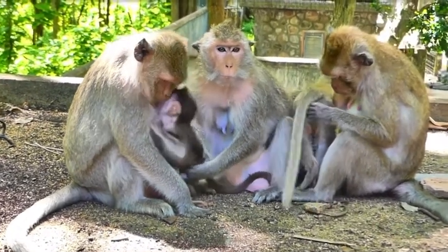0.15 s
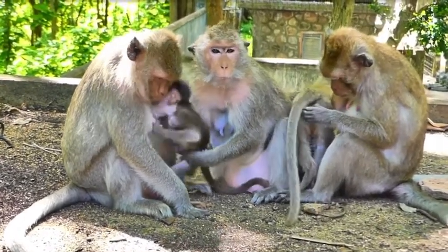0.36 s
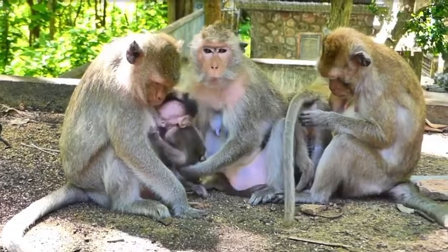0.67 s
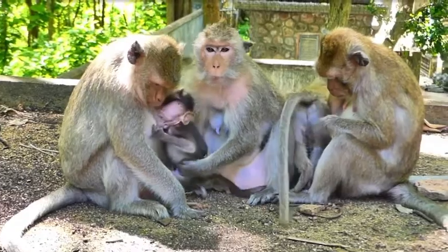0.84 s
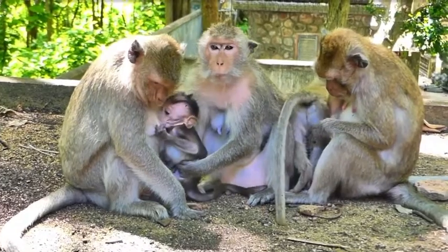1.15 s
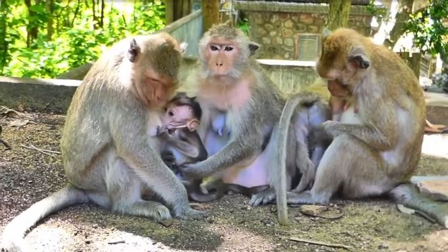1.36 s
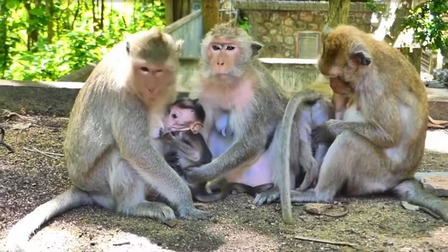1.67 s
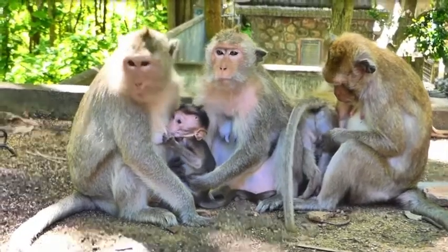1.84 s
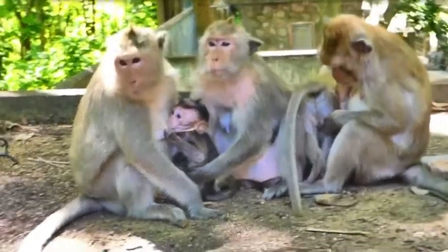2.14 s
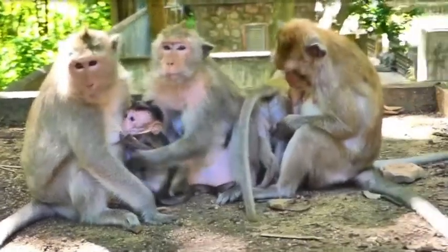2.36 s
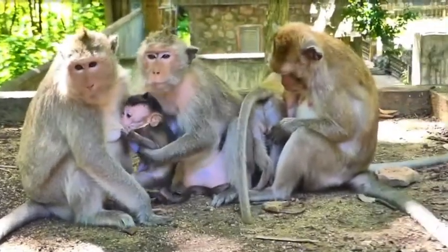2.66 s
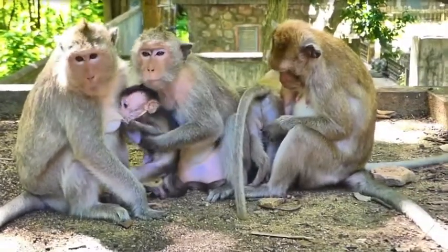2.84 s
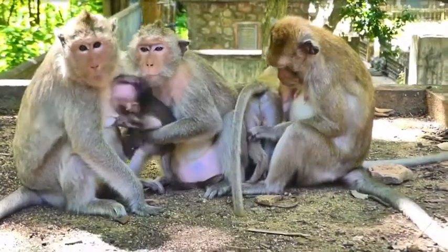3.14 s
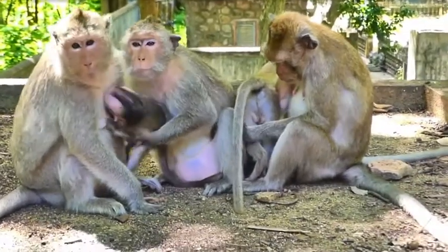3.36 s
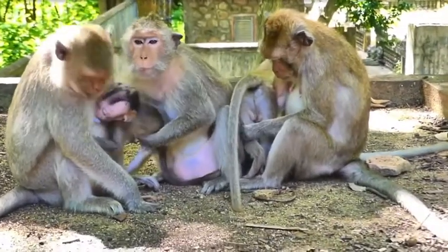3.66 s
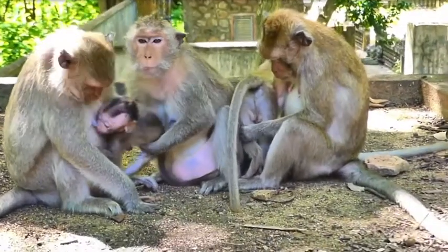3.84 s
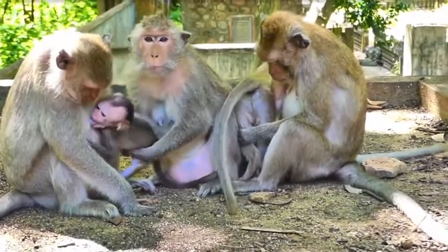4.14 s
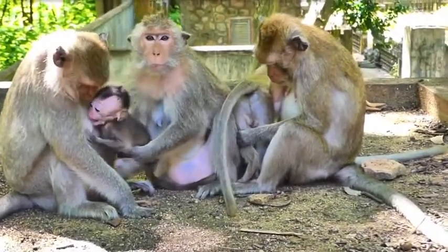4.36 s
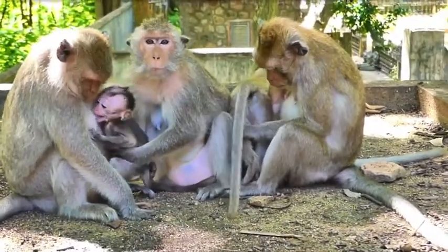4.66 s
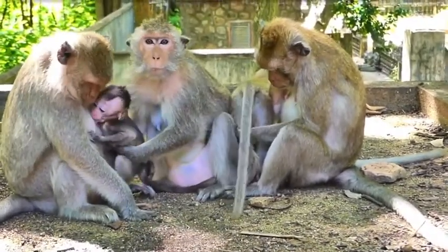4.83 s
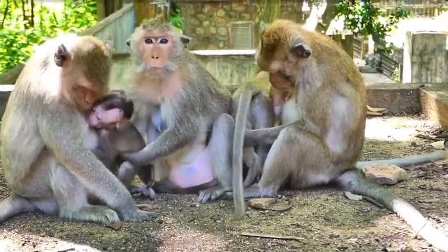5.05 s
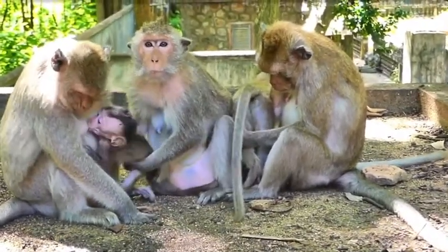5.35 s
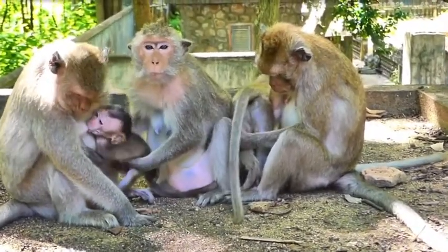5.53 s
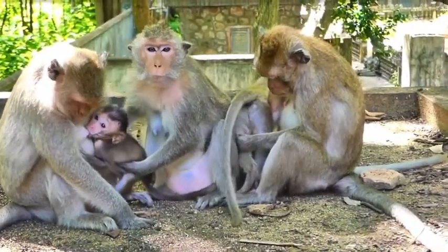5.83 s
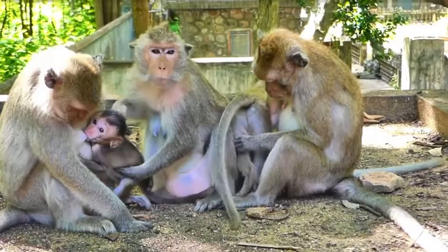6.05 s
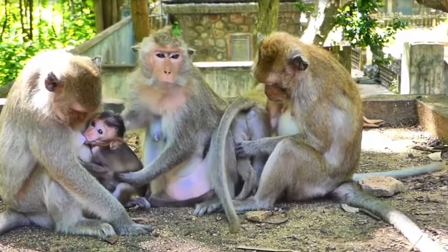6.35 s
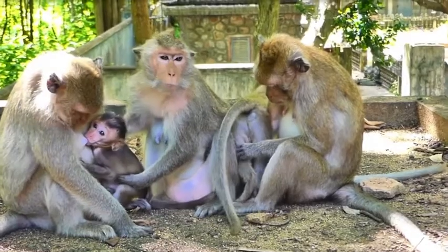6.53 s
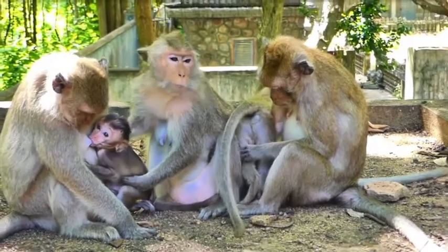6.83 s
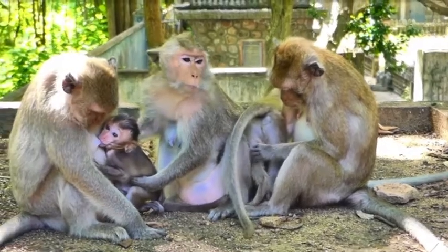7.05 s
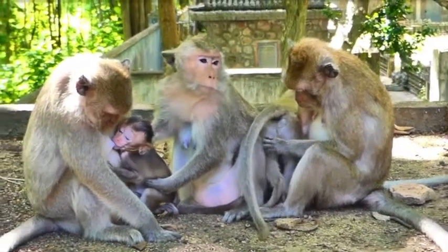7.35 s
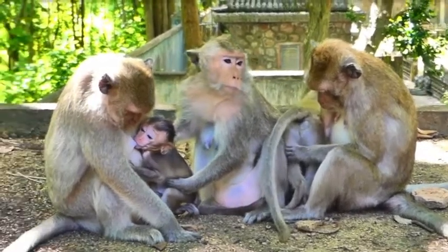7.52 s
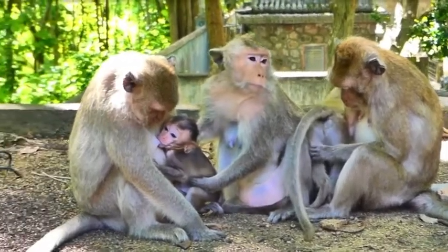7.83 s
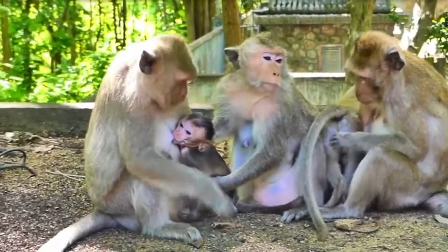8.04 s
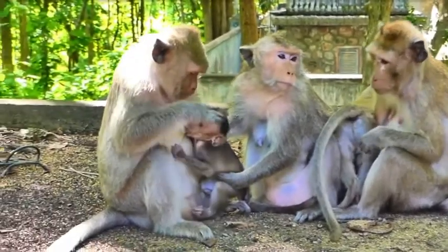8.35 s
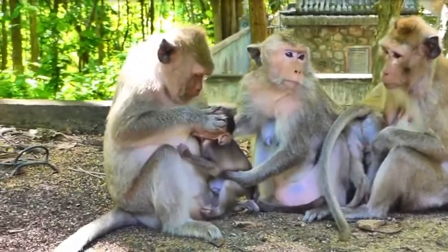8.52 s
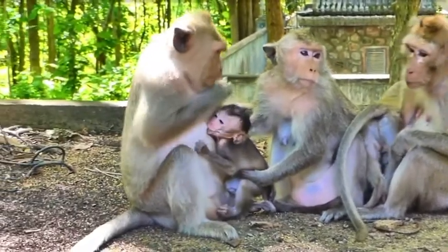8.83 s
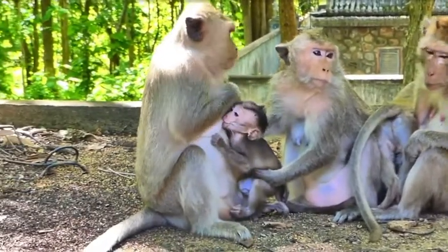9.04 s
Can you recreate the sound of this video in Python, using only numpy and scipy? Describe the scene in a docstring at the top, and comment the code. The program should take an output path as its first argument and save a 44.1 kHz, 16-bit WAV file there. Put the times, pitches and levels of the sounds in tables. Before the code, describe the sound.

Close stereo pickup in an open yard with trees and walls: quick faint monkey chirps and small ground taps come first, followed by two loud, needle-like baby squeals of under a second each, swelling in jerky pushes. The background dips slightly beneath them, then wavering whines, rustling litter, a long hollow coo and a few snaps return over ringing insects.

```python
"""Infant monkey squealing among its troop

An infant monkey close by squeals twice, a gliding whistle broken by a second vibration and puffs of air.
Farther off the troop coos, chirps, whines and hoots in harmonics shaped by mouth resonances.
Feet snap twigs and thud on dry ground as decaying modes; trunks and walls answer with decaying noise.
Insects ring on one narrow band, filtered noise rumbles and rustles, and gain control ducks the squeals."""
import sys
import numpy as np
from scipy import signal
from scipy.fft import rfft, irfft, next_fast_len
from scipy.io import wavfile
from scipy.ndimage import uniform_filter1d, map_coordinates

SR = 44100
rng = np.random.default_rng(int(sys.argv[2]) if len(sys.argv) > 2 else 0)


def to_linear_factor(level_db):
    """Convert decibel levels (scalar or array-like) to linear amplitude factors."""
    exponent = np.asarray(level_db, float) / 20
    return 10 ** exponent


def to_wav(s):
    """Save 16-bit WAV."""
    ch = np.atleast_2d(s).T  # columns
    pcm = np.round(np.clip(ch, -1, 1) * 32767)  # PCM
    wavfile.write(sys.argv[1], SR, pcm.astype(np.int16))


N = 404838
TIME = np.arange(N) / SR

# Infant's whistle, twice a leap up, a sagging top and a plunge: (time [s], pitch [Hz])
SQUEAL_PITCH = [(2.884, 7700), (2.896, 10250), (2.907, 13800), (2.927, 15150), (2.955, 16300),
                (2.985, 15200), (3.01, 15760), (3.03, 15640), (3.055, 15900), (3.085, 14900),
                (3.103, 15800), (3.14, 15000), (3.16, 15700), (3.193, 15000), (3.204, 14000),
                (3.264, 13170), (3.284, 13180), (3.314, 12180), (3.351, 12870), (3.377, 12680),
                (3.418, 14070), (3.488, 12960), (3.503, 13040), (3.519, 11100), (3.549, 8040), (3.91, 8400),
                (3.926, 10530), (3.953, 12500), (3.966, 14350), (4.022, 14080), (4.062, 14220),
                (4.162, 13790), (4.178, 13300), (4.204, 13340), (4.257, 12400), (4.291, 10850),
                (4.314, 11000), (4.344, 9470), (4.37, 9800), (4.388, 9300), (4.413, 8630), (4.432, 10600),
                (4.443, 10740), (4.46, 9930), (4.492, 12650), (4.518, 11800), (4.551, 11900),
                (4.584, 10480), (4.607, 9800), (4.645, 8480), (4.689, 6380)]
# Held level of each squeal: (start [s], end [s], level [dB])
SQUEAL_LEVELS = [(2.888, 3.545, -41), (3.913, 4.684, -41.5)]
# Quick swells in the whistle's level: (peak time [s], fall length [s], level [dB])
WHISTLE_SWELLS = [(2.895, 0.0043, -24.5), (2.914, 0.0084, -27), (2.985, 0.02, -37), (3.1, 0.031, -28),
                  (3.227, 0.031, -31), (3.27, 0.02, -31), (3.293, 0.024, -30), (3.341, 0.051, -28.5),
                  (3.383, 0.015, -28), (3.433, 0.03, -41), (3.493, 0.0089, -30.5), (3.517, 0.014, -32),
                  (3.925, 0.013, -25.5), (3.943, 0.0073, -22), (3.974, 0.039, -35), (4.034, 0.079, -38.5),
                  (4.14, 0.059, -41), (4.226, 0.018, -39), (4.272, 0.012, -27.5), (4.302, 0.033, -34.5),
                  (4.325, 0.0041, -27), (4.337, 0.01, -28), (4.351, 0.033, -27.5), (4.402, 0.017, -35),
                  (4.426, 0.0041, -27), (4.445, 0.041, -28.5), (4.468, 0.0059, -30), (4.481, 0.0074, -30),
                  (4.525, 0.043, -33.5), (4.556, 0.016, -32), (4.604, 0.018, -25), (4.621, 0.023, -27),
                  (4.653, 0.0056, -33), (4.675, 0.0099, -37.5)]
# A second, lower vibration in the whistle: (time [s], length [s], pitch [Hz], level [dB])
VOICE_BREAKS = [(4.333, 0.0081, 5040, -49.5), (4.399, 0.018, 3780, -49), (4.66, 0.011, 3090, -49),
                (4.691, 0.01, 3010, -38.5), (4.697, 0.0126, 3740, -41.5), (4.707, 0.027, 2090, -52.5)]
# Hoarse puffs of air in the squeals: (time [s], length [s], level [dB])
AIR_PUFFS = [(3.132, 0.047, -64), (3.185, 0.043, -61), (3.566, 0.045, -58), (4.696, 0.051, -43)]
# Spectrum of the puffs: (frequency [Hz], relative level [dB])
PUFF_SPECTRUM = [(1500, -23), (3000, -7), (7000, -3.5), (15000, -12.5)]
# Arched coos: (start [s], length [s], top pitch [Hz], level [dB], loss per partial [dB])
COOS = [(0.781, 0.061, 1354, -53, 2.5), (1.048, 0.13, 1327, -60, 2), (2.225, .27, 1276, -68.5, 8),
        (8.666, 0.082, 1293, -55.5, 6.5)]
# Hooked chirps, flicked upward: (start [s], length [s], from [Hz], to [Hz], level [dB])
HOOKED_CHIRPS = [(0.159, 0.095, 1944, 2510, -55), (1.25, 0.051, 794, 1060, -71.5),
                 (1.38, 0.086, 1230, 1370, -62), (1.502, 0.057, 1467, 1630, -59),
                 (1.615, 0.063, 1470, 1996, -56), (1.739, 0.044, 1750, 2010, -60)]
# Straight chirps: (start [s], length [s], from [Hz], to [Hz], level [dB])
GLIDING_CHIRPS = [(0.039, 0.039, 1650, 1384, -52), (0.079, 0.088, 1420, 1956, -56),
                  (0.248, 0.041, 2390, 2680, -56.5), (0.897, 0.15, 865, 796, -68),
                  (6.313, 0.05, 1240, 1225, -61), (6.727, 0.054, 1160, 1520, -52.5)]
# Wavering whines, one list each: (time [s], pitch [Hz], level [dB], loss per partial [dB])
WHINES = [
    [(2.07, 855, -65, 4), (2.11, 929, -73, -1), (2.17, 788, -75, 2), (2.3, 811, -76, 4),
     (2.365, 1010, -76, -2), (2.41, 984, -77, -4), (2.44, 1164, -71, -8), (2.47, 1488, -61.5, -4),
     (2.495, 1634, -66, 18)],
    [(6.148, 1284, -61, 0), (6.19, 1235, -60.5, 1), (6.21, 1363, -67, 2), (6.236, 1430, -68, -3)],
    [(4.965, 590.5, -69, -1), (5.03, 745, -67.5, 1), (5.1, 950, -76, -13.5), (5.15, 1087, -64, 3),
     (5.175, 1008, -69, -5), (5.205, 1199, -71, 12), (5.25, 1145, -64, 10), (5.28, 1008, -72.5, -3),
     (5.32, 1305, -59, 1.5), (5.43, 1543, -67, 11), (5.457, 1820, -64, 28), (5.49, 1670, -52.5, 13),
     (5.54, 1545, -61, -1.5), (5.57, 1450, -78, 8)],
    [(5.8, 728, -62, 12), (5.835, 899, -75, -8), (5.87, 1065, -68, -4.5), (5.91, 902, -77.5, 0),
     (6.09, 836, -75.5, -4)],
    [(8.82, 813, -71.5, -7), (8.9, 880, -84, -2), (8.96, 900, -71.5, -5.5), (9.04, 788, -72.5, 0),
     (9.14, 815, -73.5, -4)],
    [(8.085, 1030, -66, 5), (8.12, 1210, -73.5, -4), (8.145, 1290, -58, 2), (8.16, 1280, -76, 6)],
    [(8.215, 1260, -59, 4), (8.245, 1395, -64.5, -3), (8.262, 1293, -59, 4), (8.295, 1370, -72, -4),
     (8.335, 1245, -71, 0)],
]
# A long hollow coo that catches before its drop: (time [s], pitch [Hz], level [dB])
LONG_COO = [(7.678, 1020, -63), (7.715, 1170, -62), (7.78, 1275, -60), (7.805, 1195, -63),
            (7.92, 1205, -66), (7.932, 1080, -88), (7.96, 1090, -67), (7.99, 1040, -68), (8.01, 880, -80)]
# Its partials from the first up, the second weak: (relative level [dB])
LONG_COO_PARTIALS = [-2, -11, -9.5, -19]
# A low hoot from afar: (time [s], pitch [Hz], level [dB])
HOOT = [(2.2, 251.5, -78), (2.36, 254.4, -67.5), (2.55, 257, -72.5), (2.7, 265, -84)]
# Its partials from the first up: (relative level [dB])
HOOT_PARTIALS = [-9.5, -2.5, -1.5, -12, -9.5]
# Mouth resonances of the troop: (frequency [Hz], gain [dB])
MOUTH_RESONANCES = [(300, 5), (1200, 1), (1700, -3.5), (2000, 0), (2450, -4), (3100, 5.5), (3800, -1),
                    (4600, -11.5), (6300, 4.5), (9000, -5)]
# Twig snaps and thuds of feet: (time [s], snap level [dB], snap pitch [Hz], thud level [dB])
FOOTFALLS = [(.026, -46.5, 2380, -74), (0.5211, -43.5, 3300, -63), (1.305, -63.5, 630, -53.5),
             (1.709, -51, 2460, -80), (1.9792, -30.5, 3635, -62), (1.986, -47.5, 853, -60),
             (2.023, -46, 863, -52), (2.0568, -51, 1300, -50), (6.127, -56, 2280, -55),
             (6.8038, -42, 1530, -60), (7.63, -53, 1790, -73.5), (7.648, -51, 1380, -63.5),
             (8.0925, -40, 5200, -73), (8.228, -52, 2145, -47.5), (8.8164, -51.5, 1170, -42),
             (9.1128, -47, 1497, -45), (9.159, -46.5, 1830, -71)]
# Modes of the thudding ground: (frequency [Hz], relative level [dB], decay by 60 dB [s])
GROUND_MODES = [(318, 4.5, 0.046), (450, 9, 0.02), (975, 11, 0.007)]
# Reverberation of the yard: (frequency [Hz], decay by 60 dB [s])
YARD_DECAY = [(500, 0.94), (4000, 0.68), (15000, 0.41)]
# Gusts and shuffles over the calm: (time [s], length [s], rumble level [dB], rustle level [dB])
GUSTS = [(0.09, 0.49, -71, -106), (2.23, 0.76, -68, -79.5), (5.392, 1.18, -77.5, -61.5),
         (6.523, 0.49, -70.5, -63), (7.424, 0.11, -74, -64), (8.273, 0.27, -74, -70),
         (9.13, 0.9, -73.5, -69)]
# Spectrum of the far rumble: (frequency [Hz], relative level [dB])
RUMBLE_SPECTRUM = [(15, -57.5), (30, -32.5), (100, -6.5), (290, -6), (1000, -17), (2000, -22)]
# Spectrum of rustling leaves and litter: (frequency [Hz], relative level [dB])
RUSTLE_SPECTRUM = [(400, -34), (900, -2), (2000, -3), (4500, -2.5), (7000, -5), (10000, -8), (13000, -12.5),
                   (16000, -17.5)]
# Likeness of left and right in the noise: (frequency [Hz], correlation [-1 to 1])
STEREO_LIKENESS = [(250, -0.37), (600, -0.29), (1500, 0.2), (6000, 1), (11000, 0.57)]
# Unlikeness of the two microphone ports: (frequency [Hz], left over right [dB])
PORT_DIFFERENCE = [(40, 4), (200, 1.5), (1200, -2.5), (4000, -1.5)]


def along(points, hz):
    """Interpolation of (Hz, value) points on a logarithmic frequency axis."""
    f, value = np.transpose(points)
    return np.interp(np.log(hz + 1), np.log(f + 1), value)


def curves(rows):
    """Linear interpolation in time: one value per sample for each column after the time."""
    s, *columns = np.transpose(rows)
    return [np.interp(TIME, s, c) for c in columns]


def unit(x):
    """Normalization to a root mean square of 1."""
    return x / np.sqrt(np.mean(x ** 2) + 1e-20)


def wobble(rate):
    """Slow random modulation: a smooth curve through rate random knots a second."""
    knots = rng.standard_normal(int(N * rate / SR) + 4)
    return map_coordinates(knots, [TIME * rate])


def coloured(x, spectrum):
    """Linear filtering: the spectrum is multiplied by a gain curve, zero outside its end points."""
    m = next_fast_len(N + 8192)
    hz = np.fft.rfftfreq(m, 1 / SR)
    in_band = (hz >= spectrum[0][0]) & (hz <= spectrum[-1][0])
    return irfft(rfft(x, m) * to_linear_factor(along(spectrum, hz)) * in_band, m)[..., :N]


def bump(s, length):
    """Gaussian envelope around a moment, length being its full width at 1/e."""
    return np.exp(-((TIME - s) / length * 2) ** 2)


def phase(hz):
    """Phase as the running integral of frequency."""
    return 2 * np.pi * np.cumsum(hz) / SR


def squeals():
    """Whistle and nonlinear mixing: a second vibration makes sum and difference tones with it."""
    jitter = 1 + 0.0019 * wobble(150) + 0.00247 * wobble(40)
    hz = uniform_filter1d(curves(SQUEAL_PITCH)[0], size=240) * jitter
    size = sum(to_linear_factor(db) * (TIME > s) * (TIME < end) for s, end, db in SQUEAL_LEVELS)
    for s, length, db in WHISTLE_SWELLS:
        # the rise takes 0.7 of the time of the fall
        size = size + to_linear_factor(db) * bump(s, length * np.where(TIME < s, 0.7, 1))
    flutter_db = 1.3 * wobble(130)
    size = uniform_filter1d(size, size=40) * to_linear_factor(flutter_db) * np.sqrt(2)

    turn = phase(hz)
    overtone = to_linear_factor(-4.0) * (hz < 7900) * np.sin(2 * turn)
    out = size * (np.sin(turn) + overtone)

    mixing = np.clip(size * to_linear_factor(50), 0, 1)  # sum and difference tones need the whistle
    for s, length, low_hz, db in VOICE_BREAKS:
        sag = 0.08 * np.clip((TIME - s) / length, -1, 1)
        low = phase(low_hz * (1 - sag + 0.018 * wobble(200)))
        mixed = 1.64 * np.sin(turn - low) + 0.5 * np.sin(turn + low)
        out += to_linear_factor(db) * bump(s, length) * (np.sin(low) + mixing * mixed)

    breath = unit(coloured(rng.standard_normal(N), PUFF_SPECTRUM)) * to_linear_factor(3.5 * wobble(300))
    return out + breath * sum(to_linear_factor(db) * bump(s, length) for s, length, db in AIR_PUFFS)


def voice(rows, partials_db, fade, rough, flicker_db):
    """Harmonic series on an unsteady pitch; partials flicker independently, the high ones most."""
    start, end = round(rows[0][0] * SR), round(rows[-1][0] * SR)
    hz, db, *loss = [uniform_filter1d(c, size=400)[start:end] for c in curves(rows)]
    loss_db = sum(loss)  # 0 where the rows have no loss column
    t = TIME[:end - start]
    gate = np.clip(np.minimum(t, t[::-1]) / fade, 0, 1)
    turn = phase(hz * (1 + rough * wobble(70)[start:end]))
    knots = rng.standard_normal((len(partials_db), 40))
    tone = 0
    for k, partial_db in enumerate(partials_db):
        flicker = flicker_db * np.interp(t * 45, np.arange(40), knots[k]) * np.sqrt(k + 1)
        # a loss grows with each partial; a negative loss lifts all the upper partials alike
        dulling_db = np.maximum(k * loss_db, min(k, 1) * loss_db)
        tone = tone + to_linear_factor(db + partial_db - dulling_db + flicker) * np.sin((k + 1) * turn)
    out = np.zeros(N)
    out[start:end] = np.sqrt(2) * gate * tone
    return out


def call(s, length, pitch, db, loss_db):
    """Frequency glide under an arched envelope: five partials on a (share of length, Hz) contour."""
    share = np.linspace(0, 1, num=21)
    hz = np.interp(share, *np.transpose(pitch))
    rising = hz[10] > 1.08 * hz[0] and hz[-1] > hz[10]
    loudest_at = 0.32 if rising else 0.22  # share of length: steep risers peak late
    level_db = db + np.interp(share, [0, loudest_at, 1], [-13, 0, -6.5])
    partials_db = [-loss_db * k - 14 * (k > 2) for k in range(5)]  # further loss above the third
    rows = np.transpose([s + length * share, hz, level_db])
    return voice(rows, partials_db, fade=0.007, rough=0.011, flicker_db=2.6)


def purity(from_hz, to_hz):
    """Spectral slope growing with pitch: dB lost a partial, 6.5 at 1 kHz and 7 more per kHz."""
    mean_khz = (from_hz + to_hz) / 2000
    return max(6.5 + 7 * (mean_khz - 1), 2)


def troop():
    """Source and resonator: harmonic calls pass fixed mouth resonances; the far hoot bypasses them."""
    out = np.zeros(N)
    for s, length, hz, db, loss_db in COOS:
        # scoop up, hold, sag
        pitch = [(0, hz * (1 - 0.25)), (0.24, hz), (0.773, hz), (1, hz * (1 - 0.081))]
        out += call(s, length, pitch, db, loss_db)
    for s, length, from_hz, to_hz, db in HOOKED_CHIRPS:
        pitch = [(0, from_hz), (0.5, from_hz * 1.01), (0.8, to_hz), (1, to_hz)]
        loss_db = 5.5 * (from_hz / 1500) ** 3
        out += call(s, length, pitch, db, loss_db)
    for s, length, from_hz, to_hz, db in GLIDING_CHIRPS:
        out += call(s, length, [(0, from_hz), (1, to_hz)], db, purity(from_hz, to_hz))
    for rows in WHINES:
        out += voice(rows, [0, 0, -6, -17], fade=0.007, rough=0.012, flicker_db=2)
    out += voice(LONG_COO, LONG_COO_PARTIALS, fade=0.007, rough=0.006, flicker_db=1.5)
    hoot = voice(HOOT, HOOT_PARTIALS, fade=0.03, rough=0.03, flicker_db=4.5)
    return coloured(out, MOUTH_RESONANCES) + hoot


def steps():
    """Impact and modal decay: a noisy snap of a few cycles over a short hollow thud."""
    out, t = np.zeros(N + SR), TIME[:2048]
    for s, db, hz, thud_db in FOOTFALLS:
        crack = unit(uniform_filter1d(rng.standard_normal(len(t)), size=int(SR / hz) + 1))
        decay = to_linear_factor(-60 * t * hz / 15)  # 60 dB in 15 cycles
        snap = decay * (1 + 0.55 * crack) * np.sin(2 * np.pi * hz * t)
        hollow = 0
        for mode_hz, mode_db, t60 in GROUND_MODES:
            mode_level = to_linear_factor(mode_db + rng.normal(0, 1) - 60 * t / t60)
            hollow = hollow + mode_level * np.sin(2 * np.pi * mode_hz * t)
        thud = (1 - np.exp(-t / 0.0066)) * hollow  # soft onset
        out[round(s * SR):][:len(t)] += to_linear_factor(db) * snap + to_linear_factor(thud_db) * thud
    return out[:N]


def yard(x, spread):
    """Reverberation off trunks and walls: convolution with noise whose decay depends on frequency."""
    hz, t, z = signal.stft(rng.standard_normal((2, SR // 2)), SR, nperseg=256)
    decay = to_linear_factor(-60 * t / along(YARD_DECAY, hz)[:, None])
    mid, side = signal.istft(z * decay, SR, nperseg=256)[1]
    tail = np.array([mid + spread * side, mid - spread * side]) / np.linalg.norm(mid)
    delayed = np.pad(x, (300, 0))[None]  # the tail starts 300 samples late
    return signal.fftconvolve(delayed, tail, axes=1)[:, :N]


def insects():
    """Narrow-band resonance: a near caller clicks its ringing shell over a randomly modulated crowd."""
    cycle = 2 * np.pi * (TIME - 0.2) / 0.878
    hz = 5455 + 42 * np.sin(cycle) - 14 * np.sin(2 * cycle)  # creeps up, drops back for all

    def churn(rate):
        """Quadrature modulation: two random envelopes on one carrier make a narrow band."""
        return wobble(rate) * np.sin(phase(hz)) + wobble(rate) * np.cos(phase(hz))

    clicks_per_s, click_rise_s = 117, 0.0023
    count = np.cumsum(clicks_per_s * (1 + 0.005 * wobble(9))) / SR
    leader = np.zeros(N)
    for back in range(3):  # the latest clicks overlap
        click = np.floor(count) - back
        since = TIME - np.interp(click, count, TIME, left=-1)
        strength = np.where(click % 2, 0.5, 1)  # every second click is weaker
        envelope = since * np.exp(-since / click_rise_s)
        leader += strength * envelope * np.sin(2 * np.pi * hz * since)
    centre = unit(churn(205)) + to_linear_factor(-1.5 + 2.5 * wobble(14)) * unit(leader)
    others = 0.12 * churn(265)  # opposite in the two channels, for width
    return to_linear_factor(-62.5) * unit(np.array([centre + others, centre - others]))


def rush(spectrum, patchy_db):
    """Partly correlated stereo noise of rms 1, its gain patchy in time and frequency."""
    hz, _, z = signal.stft(rng.standard_normal((2, N)), SR, nperseg=512)
    field = uniform_filter1d(rng.standard_normal(z.shape[1:]), size=6, axis=0)
    field = uniform_filter1d(field, size=10, axis=1)
    # mid-side angle that gives the wanted correlation
    turn = np.arccos(np.clip(along(STEREO_LIKENESS, hz), -1, 1))[:, None] / 2
    patched = z * to_linear_factor(patchy_db * unit(field)) * [np.cos(turn), np.sin(turn)]
    mid, side = signal.istft(patched, nperseg=512)[1][:, :N]
    return unit(coloured(np.array([mid + side, mid - side]), spectrum))


def air():
    """Broadband noise under slow envelopes: far rumble, and leaves and litter rustling in gusts."""
    low, high = to_linear_factor(-67), to_linear_factor(-71)  # the calm
    for s, length, rumble_db, rustle_db in GUSTS:
        low = low + to_linear_factor(rumble_db) * bump(s, length)
        high = high + to_linear_factor(rustle_db) * bump(s, length)
    rumble = low * to_linear_factor(1.3 * wobble(6.7)) * rush(RUMBLE_SPECTRUM, patchy_db=1.44)
    rustle = high * to_linear_factor(0.76 * wobble(16)) * rush(RUSTLE_SPECTRUM, patchy_db=3.0)
    return rumble + rustle


def scene():
    """Superposition of sources and echoes; the highest notes beam unevenly to the left port."""
    near, far, feet = squeals(), troop(), steps()
    khz_over = (curves(SQUEAL_PITCH)[0] - 11000) / 1000
    lean_db = np.clip(0.6 * khz_over, -0.3, 2.1) + 1.1 * wobble(25)
    near_echo = to_linear_factor(-16.5) * yard(near, spread=0.38)
    far_echo = to_linear_factor(-13.5) * yard(far + feet, spread=0.62)
    direct = near * to_linear_factor([lean_db, -lean_db]) + far + feet
    return direct + near_echo + far_echo + insects() + air()


def roll_off(x):
    """The treble ends steeply here."""
    return signal.sosfilt(signal.butter(12, 15720, fs=SR, output="sos"), x)


def record(dry):
    """Compression after two unlike ports: gain falls with smoothed level and recovers slowly."""
    ports = []
    for channel, side in zip(dry, (1, -1)):
        response = [(f, side * db / 2) for f, db in PORT_DIFFERENCE]
        ports.append(coloured(channel, [(0.0072, 0)] + response + [(15900, 0)]))
    stereo = np.array(ports)

    threshold_db, share_taken_back, release_db_per_s = -44.5, 0.25, 21
    power = uniform_filter1d(np.mean(stereo ** 2, axis=0), size=2000)
    level_db = 10 * np.log10(np.abs(power) + 1e-12)
    release_db = release_db_per_s * TIME
    held_db = np.maximum.accumulate(level_db + release_db) - release_db  # peaks decay linearly in dB
    gain_db = -share_taken_back * np.maximum(held_db - threshold_db, 0)
    mix = stereo * to_linear_factor(uniform_filter1d(gain_db, size=3000))
    return roll_off(mix)


dry = scene()
out = record(dry)
to_wav(out)
```